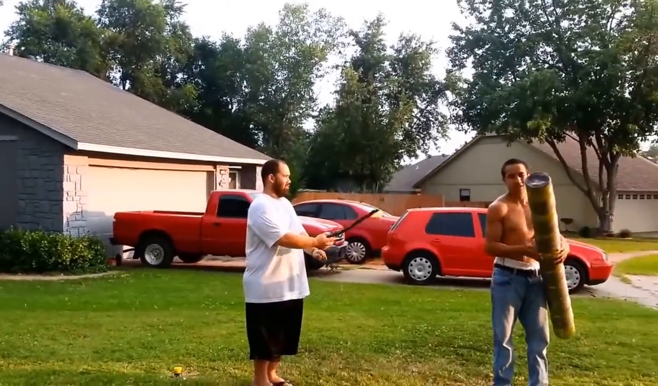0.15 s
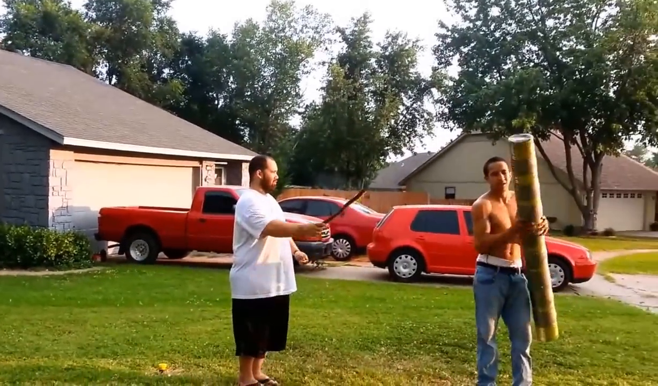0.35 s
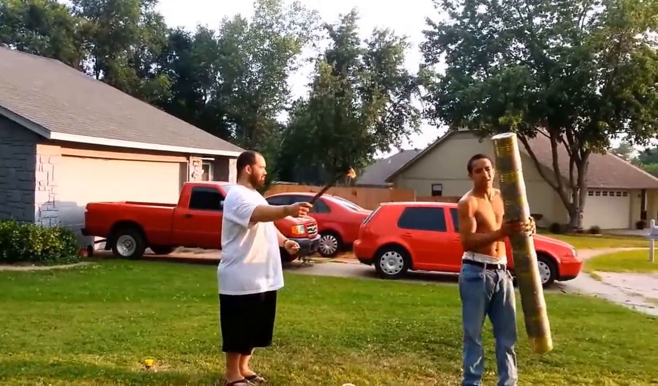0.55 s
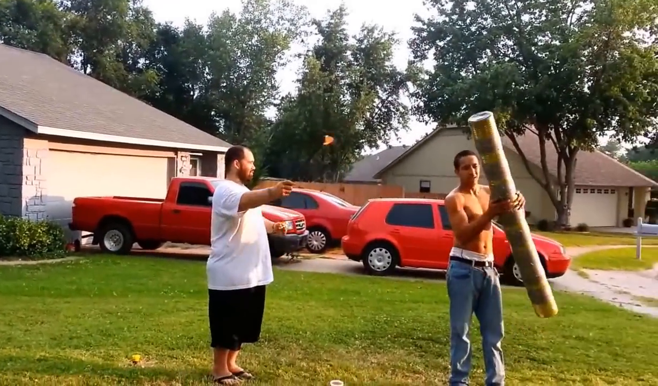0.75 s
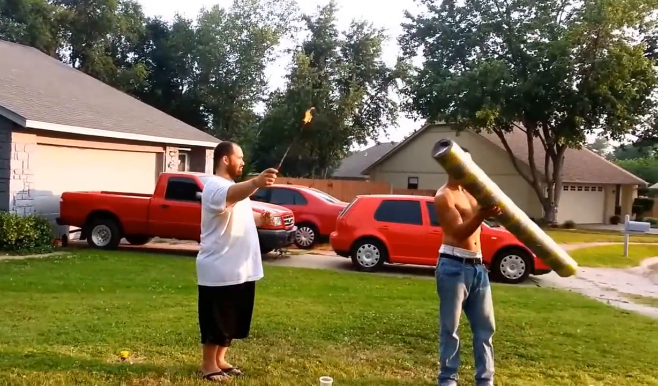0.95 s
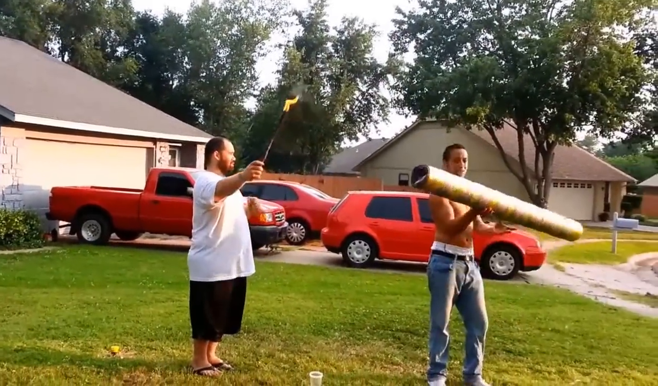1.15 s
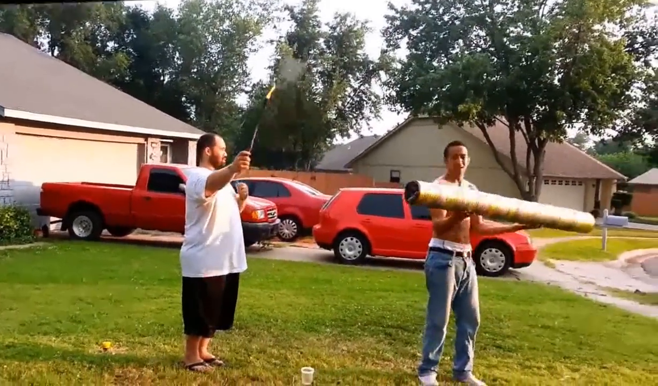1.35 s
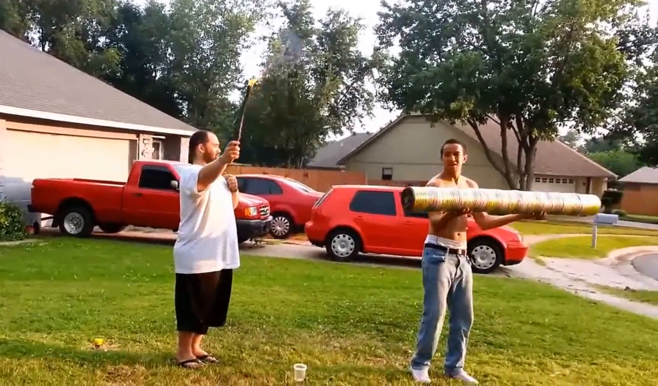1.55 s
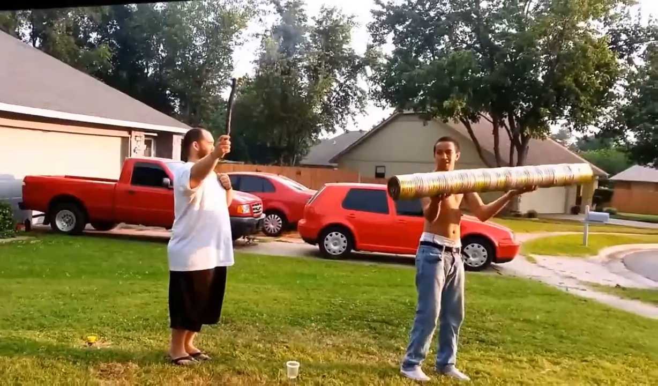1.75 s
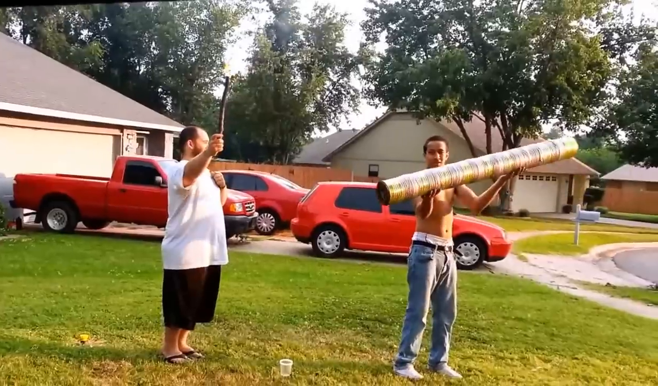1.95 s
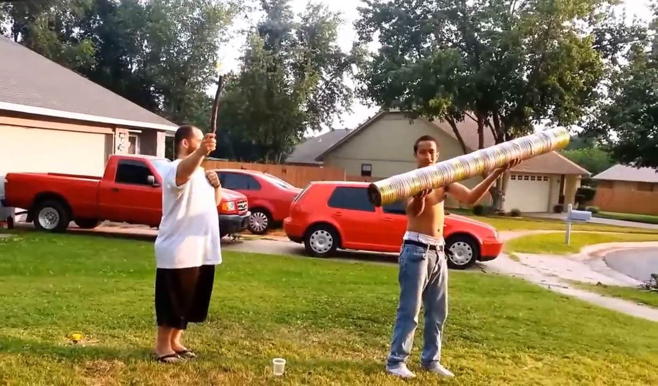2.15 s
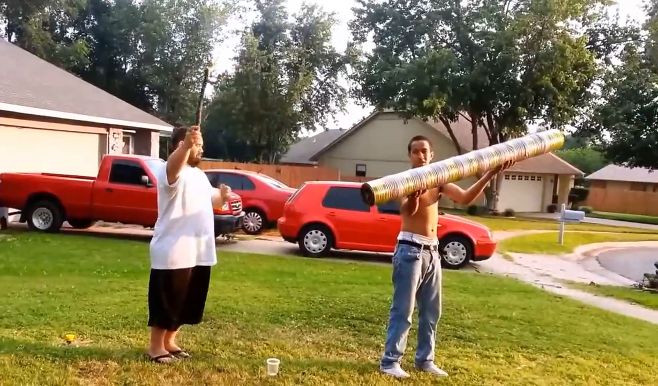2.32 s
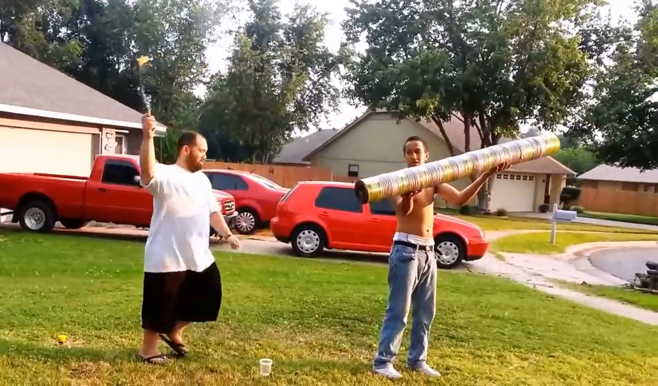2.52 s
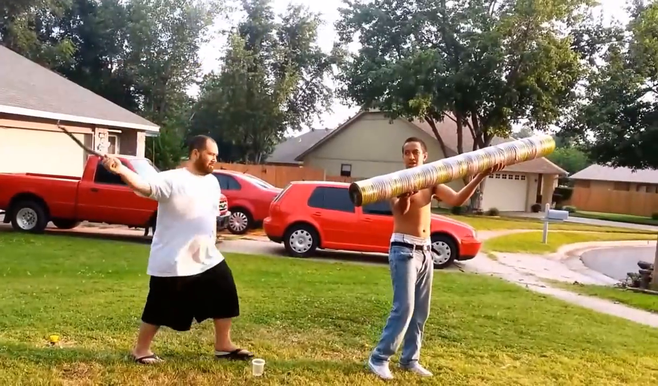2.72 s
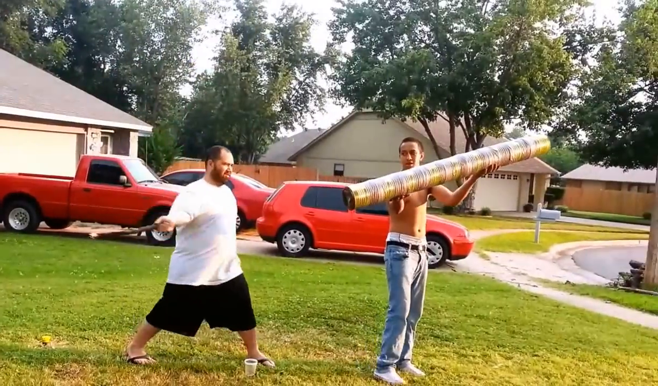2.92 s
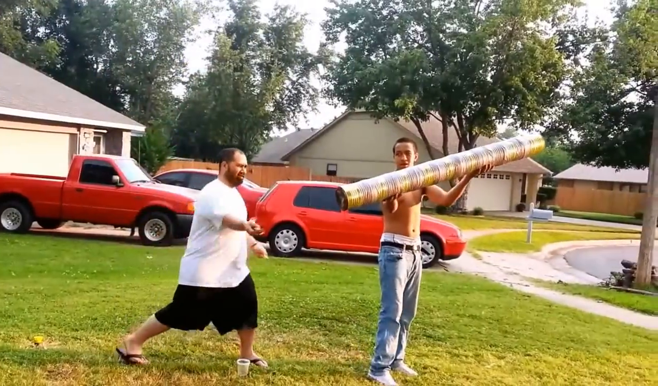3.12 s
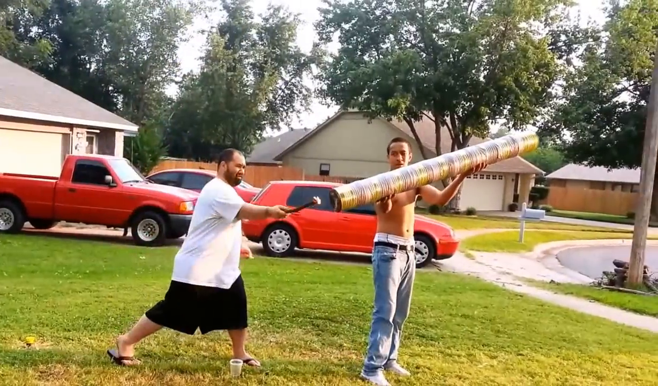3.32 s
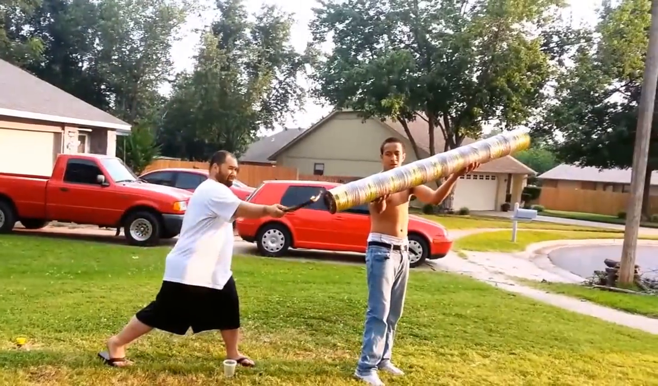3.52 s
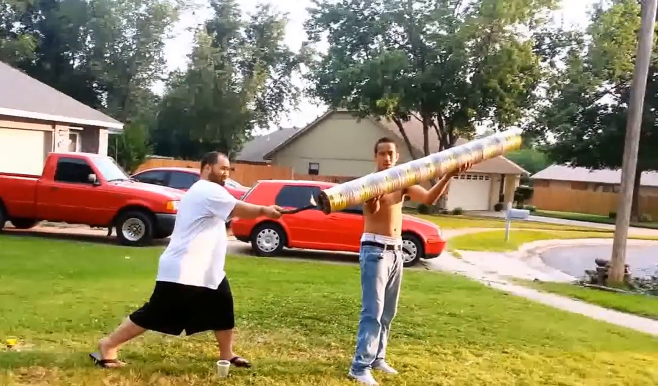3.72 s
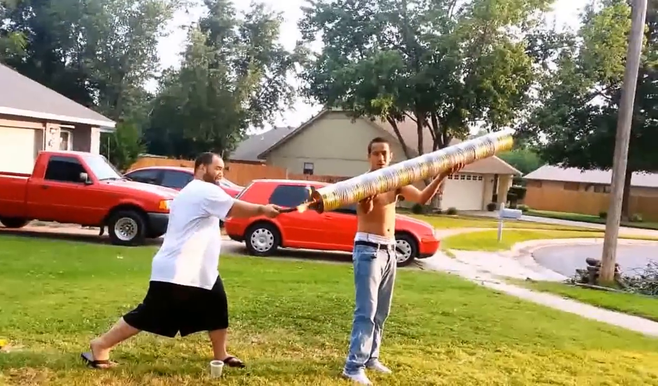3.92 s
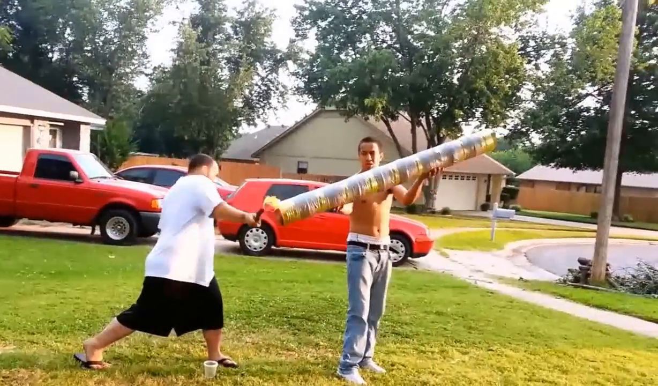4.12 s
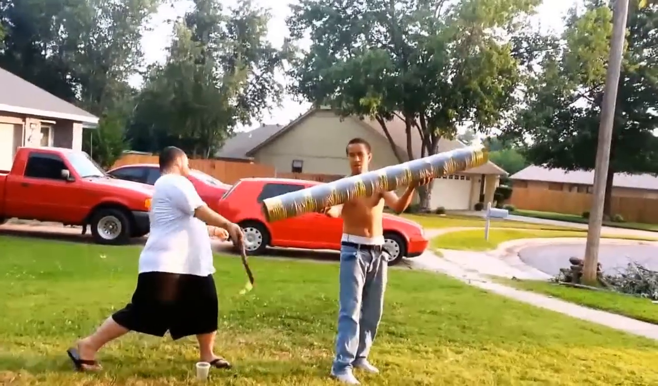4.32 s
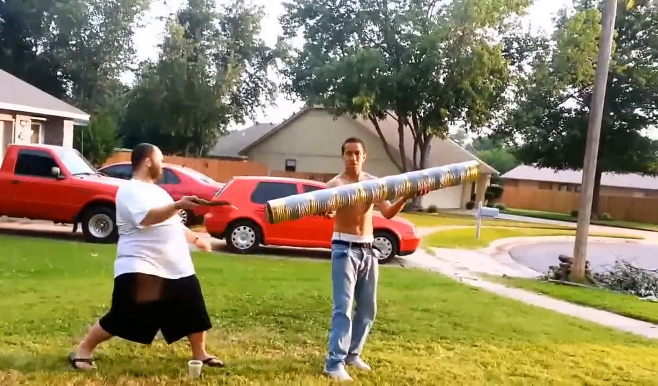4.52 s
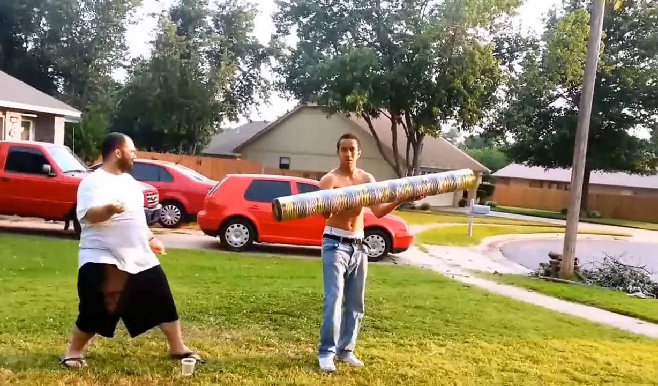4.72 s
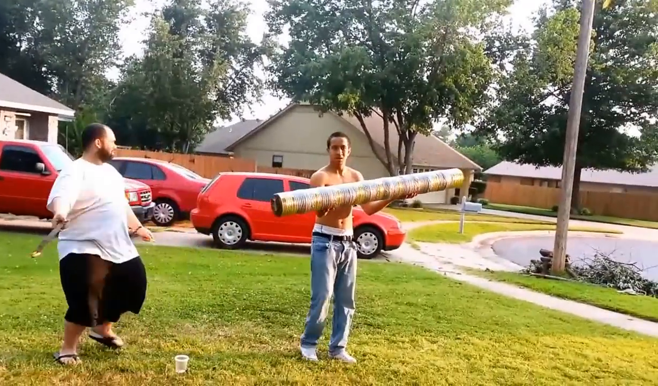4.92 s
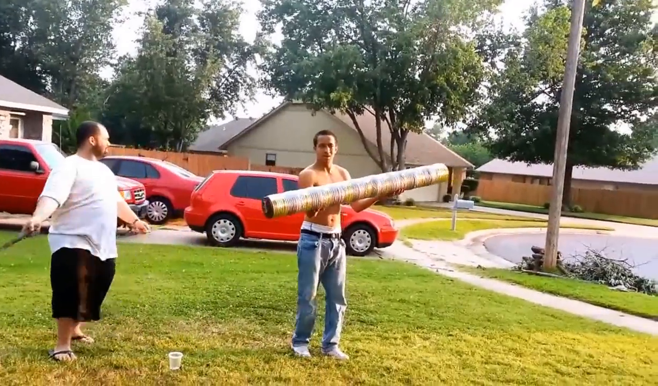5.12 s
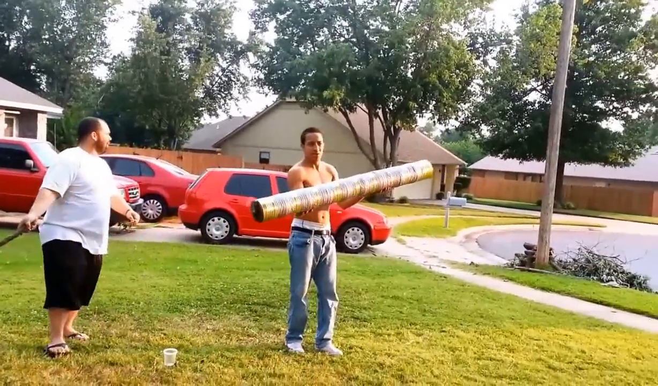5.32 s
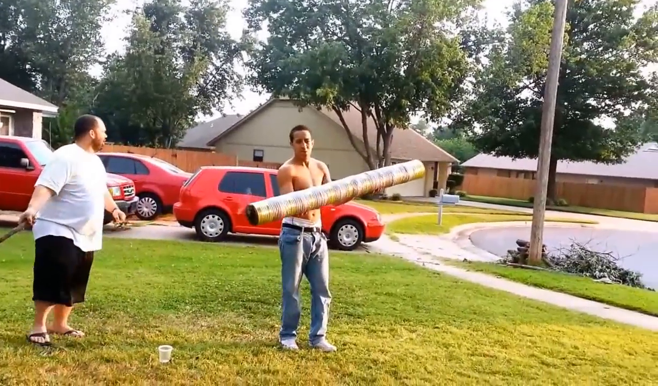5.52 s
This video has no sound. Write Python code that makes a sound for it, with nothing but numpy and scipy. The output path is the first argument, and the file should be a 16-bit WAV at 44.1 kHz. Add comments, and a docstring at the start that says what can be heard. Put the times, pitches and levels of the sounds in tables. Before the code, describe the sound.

Handheld camera outdoors among houses and trees: soft handling scuffs, insects and a low hum. A hoarse falling bird call comes before a single sharp distant pop with a short scattered tail. Then a massive, clipped cannon blast bursts out, full of snaps and thuds from nearby walls, followed half a second later by a second crack from far houses. The roar dulls and dies away, the yard returns and the bird calls again.

```python
"""Tube cannon in a suburban yard

Outdoors among houses and trees, a homemade tube cannon fires and overloads a small camera microphone.
The bang is shaped noise and separate echoes that darken into a roll; far house fronts return a second crack.
Earlier a firecracker, some way off, gives a sharp pulse, wall echoes and a scattered tail.
An air conditioner hums in noise bands under a wash of leaves and far traffic; insects shrill in bands and
thin tones, soft handling noises scuff and bump, and a bird gives two falling calls built from harmonics."""
import sys
import numpy as np
from scipy import signal
from scipy.fft import rfft, irfft, next_fast_len
from scipy.io import wavfile
from scipy.ndimage import uniform_filter1d

SR = 44100
rng = np.random.default_rng(int(sys.argv[2]) if len(sys.argv) > 2 else 0)


def unload_audio(sound):
    """Save the sound as a 16-bit wav file, at the path given as the first command line argument."""
    columns = np.transpose(np.atleast_2d(sound))
    # keep every value between -1 and 1, then stretch to whole-number steps
    steps = np.round(np.clip(columns, -1, 1) * 32767)
    wavfile.write(sys.argv[1], SR, steps.astype(np.int16))


N = 245135
TIME = np.arange(N) / SR

# The yard's wash of leaves and far traffic: f/Hz, relative level/dB per Hz
YARD_SPECTRUM = [(12, -68), (20, -43), (76, -15.5), (135, -7.5), (169, -9.5), (211, -1), (249, -7),
                 (433, -3.5), (587, -12), (1590, -15), (1850, -14), (2280, -16), (3250, -16.5), (3970, -17),
                 (12000, -36.5), (14500, -46), (15500, -70)]
# Air conditioner hum, one noise band a row: f/Hz, width/Hz, rms level/dB
AIR_CONDITIONER = [(104.4, 2.3, -58), (142, 2.9, -51), (216, 9, -51), (292, 19, -49.5), (354, 18, -49),
                   (466, 66, -49.5)]
# Insect bands in the trees, at full strength between: start t/s, end t/s, f/Hz, width/Hz, rms level/dB
INSECT_BANDS = [(0, 6.1, 1954, 45, -54), (0, 0.73, 2050, 55, -51.5), (1.1, 3.65, 2640, 130, -54.5),
                (0.63, 5.56, 3890, 160, -53), (0.088, 5.56, 6600, 1300, -53)]
# Thin notes among the insects, at full strength between: start t/s, end t/s, f/Hz, rms level/dB
INSECT_NOTES = [(-0.5, 6.1, 2056, -56), (1.4, 3.63, 2703, -54), (-0.5, 1.8, 2500, -60),
                (-0.5, 1.56, 3585, -52.5), (-0.5, 5.56, 3585, -55.5), (1.5, 2, 4215, -54.5),
                (1.5, 3.8, 4230, -61)]
# Soft handling noises: t/s, rms level before the fades/dB, f/Hz, length/s
HANDLING_NOISES = [(0.177, -44, 7000, 0.096), (0.194, -39, 7000, 0.014), (0.223, -35, 6200, 0.017),
                   (0.224, -34, 1850, 0.015), (0.197, -39, 1900, 0.015), (0.2, -33.5, 385, 0.038),
                   (0.843, -35, 400, 0.03), (3.068, -41, 298, 0.052), (3.877, -31, 260, 0.033)]

# Bird calls: start t/s, end t/s, start f/Hz, end f before the break/Hz, bend (under 1 falls early),
# tone gain/dB, rush level at the end before the fade/dB
BIRD_CALLS = [(1.217, 1.457, 891, 827, 1.05, -44, -53), (5.179, 5.428, 924, 822, 1.25, -42, -47)]
# Harmonics that swell and fade in turn as the throat moves, one list a call:
# multiple of the call's f, level against the tone gain/dB, loudest t/s, spread/s
BIRD_HARMONICS = [
    [(4, 7, 1.385, 0.085), (6, -6, 1.25, 0.04), (7, -3, 1.375, 0.055), (8, -2, 1.405, 0.045),
     (9, -0.5, 1.314, 0.06), (10, -9, 1.35, 0.06), (11, -8.5, 1.355, 0.065), (15, -11, 1.38, 0.08)],
    [(4, 8, 5.36, 0.115), (6, -6, 5.3, 0.07), (8, 0.5, 5.345, 0.115), (9, -6, 5.35, 0.09),
     (10, -9, 5.28, 0.085), (11, -13, 5.35, 0.054), (15, -17, 5.33, 0.06)],
]
# Notes from the other side of its voice box: start t/s, end t/s, start f/Hz, end f/Hz, rms level/dB
BIRD_SIDE_NOTES = [(1.412, 1.462, 4130, 4040, -46), (5.185, 5.32, 6930, 6580, -48)]
# Each call breaks at its end: time constant, and the shares by which the pitch drops and wavers
BREAK_S, BREAK_DROP, BREAK_WAVER = 0.014, 0.07, 0.025
WALL_S, WALL_DB = 0.062, -10  # a house wall repeats each call
RUSH_HZ, RUSH_WIDTH_HZ = 6800, 1700  # the hoarse rush under each call

# Firecracker's direct wave: f/Hz, relative level/dB per Hz
POP_SPECTRUM = [(40, -50), (150, -6.5), (300, -1.5), (550, 9), (900, 3), (1400, -10), (2500, -9.5),
                (4000, -44), (8000, -62), (15000, -72)]
# Its scattered tail: f before air loss/Hz, relative level/dB per Hz
POP_TAIL_SPECTRUM = [(100, -28), (300, 0.5), (700, 3), (1600, 3), (3000, -3.5), (5000, -11.5), (8000, -25),
                     (15000, -78)]
# Direct wave, then its return off a flat wall and eaves: t/s, peak level/dB
POP_ARRIVALS = [(1.875, 2), (1.9106, -9)]
# Echoes from the ground, cars and houses: t/s, peak level of the main swing/dB, f/Hz
POP_WALL_ECHOES = [(1.8760, -15, 1600), (1.8795, -21, 330), (1.8830, -15, 1650), (1.8956, -12.5, 1900),
                   (1.9114, -18, 1600), (1.9133, -13.5, 604), (1.9319, -14.5, 1300), (1.9555, -21, 2200),
                   (1.972, -19, 1500), (2.023, -19, 1500), (2.03, -20, 2700), (2.061, -30, 1900)]
# Tails from the yard, the houses and the street beyond: t/s, starting level/dB, fall/(dB/s)
POP_TAIL_FADES = [(1.875, -25, 108), (1.911, -31.5, 48), (2.02, -37.5, 73)]
POP_S, POP_SMEAR_S = 1.875, 0.002

# Sharp part of the bang leaving the tube: f/Hz, relative level/dB per Hz
CRACK_SPECTRUM = [(200, -19), (400, -4), (600, 0.5), (1000, 1.5), (1700, -0.5), (2800, -1), (4500, -2.5),
                  (7000, -3.5), (9500, -11), (11500, -22), (15000, -42)]
# Low part of the bang leaving the tube: f/Hz, relative level/dB per Hz
BOOM_SPECTRUM = [(20, -48), (45, -26), (80, -11), (130, 0), (215, 3), (300, -1), (440, 2), (600, -7.5),
                 (1000, -10), (3000, -60)]
# The bang as far house fronts throw it back: f before air loss/Hz, relative level/dB per Hz
SLAP_SPECTRUM = [(100, -18), (500, -11), (1000, 1), (1900, 0.5), (2700, -10), (5000, -17.5), (9000, -25),
                 (15000, -73)]
# Bright edge of the bang before air and grass dull it: f/Hz, relative level/dB per Hz
EDGE_SPECTRUM = [(100, 2), (1000, -7), (4000, -2), (7000, -9), (10000, -3.5), (13500, -2.5), (15000, -31)]
# Single echoes from walls and roofs: t/s, peak level of the main swing/dB, f/Hz
BANG_WALL_ECHOES = [(4.0115, 6.5, 420), (4.021, 5, 353), (4.038, -3, 383), (4.0465, 1, 344),
                    (4.054, -5, 386), (4.0705, 0, 350), (4.079, 0, 395), (4.088, -5, 334),
                    (4.103, -3, 1100), (4.106, -3, 2600), (4.111, -5, 400), (4.1265, 3, 930),
                    (4.1725, 2, 895), (4.173, 12, 1840), (4.178, -10, 278), (4.189, 5, 890),
                    (4.202, -3, 1000), (4.221, -6, 890), (4.228, -1, 1400), (4.248, 15, 2600),
                    (4.278, -1, 1470), (4.302, 0, 403), (4.303, 7, 2680), (4.326, 3.5, 2550),
                    (4.328, -5.5, 376), (4.358, 1, 2800), (4.375, -4, 520), (4.381, -9, 220),
                    (4.457, -4.5, 432), (4.4675, 1, 171), (4.468, -6.5, 104), (4.469, 0, 930),
                    (4.488, -3, 277), (4.499, -10.5, 199), (4.506, -8, 130), (4.5125, 7, 1380),
                    (4.519, 8, 1580), (4.5255, 4, 1430), (4.5415, 9.5, 1600), (4.562, 4, 900),
                    (4.579, -13, 1800), (4.587, -4, 1760), (4.592, 3, 1400)]
# Swells from groups of houses, before the near boost: t/s, crack gain/dB, slap gain/dB, boom gain/dB,
# rise time constant/s, fall/(dB/s)
HOUSE_SWELLS = [(4.025, -10.5, -43, -11, 0.014, 128), (4.478, -24, -14.5, -11, 0.0082, 117),
                (4.518, -13.5, -14.5, -33, 0.025, 81), (4.675, -36, -27, -24.5, 0.03, 70),
                (4.765, -48, -28, -31, 0.015, 79), (5.04, -55, -37, -37.5, 0.047, 56)]
FIRE_S, BANG_SMEAR_S = 3.9716, 0.0017
STREET_S, SAG_DB_PER_S = 0.35, 10  # the roll sags slowly while the wave crosses the street
# Gains of the roll before the near boost, and its fall after the street
CRACK_DB, CRACK_FALL_DB_PER_S = -6.5, 35
BOOM_DB, BOOM_RISE_S, BOOM_FALL_DB_PER_S = -15, 0.011, 36
# Fences, trunks and cars: echo count, time they span, level above the rolling crack gain, spread, pitch range
FACET_COUNT, FACET_SPAN_S, FACET_DB, FACET_SPREAD_DB = 70, 0.85, 5, 2.5
FACET_LOW_HZ, FACET_HIGH_HZ = 300, 3000
# The rumble behind the far houses' thump
RUMBLE_S, RUMBLE_HZ, RUMBLE_WIDTH_HZ = 4.47, 89, 18
RUMBLE_DB, RUMBLE_FALL_DB_PER_S = -33.5, 34


def amp(db):
    """Converts decibels to gain."""
    return 10 ** (np.asarray(db) / 20)


def evened(x):
    """Scales a signal to rms 1."""
    return x / np.sqrt(np.mean(x ** 2) + 1e-20)


def read(points, hz):
    """Reads a spectrum in dB on a log-frequency axis."""
    f, value = np.transpose(points)
    return np.interp(np.log(hz + 1), np.log(f), value)


def add(mix, s, sound):
    """Mixes a sound in at time s, cutting whatever runs past the end."""
    part = mix[round(s * SR):][:len(sound)]
    part += sound[:len(part)]


def coloured(x, spectrum):
    """Filters a signal by a spectrum and scales it to rms 1."""
    gain = amp(read(spectrum, np.fft.rfftfreq(len(x), 1 / SR)))
    return evened(irfft(rfft(x) * gain, len(x)))


def band_noise(hz, width, size):
    """Noise in one resonance, scaled to rms 1 over the full length; around 0 Hz it is a slow random curve."""
    full = next_fast_len(N)
    f = np.fft.rfftfreq(full, 1 / SR)
    resonance = 1 / (1 + ((f - hz) / width) ** 2)
    return evened(irfft(rfft(rng.standard_normal(full)) * resonance, full))[:size]


def scatter(spectrum, start_s, lumpy_db, patchy_db, air_db=1.0, air_power=0.99):
    """Countless reflections in clumps of differing colour; later ones lose treble in the air they cross."""
    size = next_fast_len(N)
    clumps = evened(uniform_filter1d(rng.standard_normal(size), size=130))
    taps = coloured(rng.standard_normal(size) * amp(lumpy_db * clumps), spectrum)
    hz, t, z = signal.stft(taps, SR, nperseg=256)
    patches = uniform_filter1d(rng.standard_normal(z.shape), size=3, axis=1)
    patches = evened(uniform_filter1d(patches, size=5, axis=0))
    # air_db is the loss per second at 1 kHz; it stops growing after one second
    air_loss_db = air_db * (hz[:, None] / 1000) ** air_power * np.clip(t - start_s, 0, 1)
    dark = signal.istft(z * amp(patchy_db * patches - air_loss_db), SR, nperseg=256)[1][:N]
    local_rms = np.sqrt(uniform_filter1d(dark ** 2, size=2200) + 1e-12)  # over 50 ms
    return dark / local_rms * (TIME >= start_s)  # level is left to the caller's fade


def echoes(rows, smear_s, damping, rough):
    """Each surface returns a short pressure swing, then a cluster of weaker ones from its uneven face."""
    out, t = np.zeros(N), TIME[:SR // 2]
    for s, db, hz in rows:
        ring = t ** 2 * np.sin(2 * np.pi * hz * t) * np.exp(-damping * hz * t)
        swing = np.gradient(ring)  # push and pull cancel
        cluster = rough * np.sqrt(hz / SR) * rng.standard_normal(len(t)) * np.exp(-t / smear_s)
        smeared = swing + signal.fftconvolve(cluster, swing)[:len(t)]
        add(out, s, amp(db) * smeared / abs(swing).max())
    return out


def yard(wash_db=-37.5, swell_db=1.0):
    """A slowly swelling wash of leaves and far traffic, with the air conditioner as narrow noise bands."""
    wash = coloured(rng.standard_normal(next_fast_len(N)), YARD_SPECTRUM)[:N]
    wash *= amp(wash_db + swell_db * band_noise(0, 1.3, N))
    hum = sum(amp(db) * band_noise(hz, width, N) for hz, width, db in AIR_CONDITIONER)
    return wash + hum


def insects(fade_s=0.17, waver_hz=5, flicker_db=3):
    """Soft shrill noise bands that come and go, with thin notes wavering in pitch and level among them."""
    def sings(start, end):
        """Fades a singer in before its start and out after its end."""
        return np.interp(TIME, [start - fade_s, start, end, end + fade_s], [0, 1, 1, 0])

    chorus = np.zeros(N)
    for start, end, hz, width, db in INSECT_BANDS:
        chorus += amp(db) * band_noise(hz, width, N) * sings(start, end)
    for start, end, hz, db in INSECT_NOTES:
        pitch_hz = hz + waver_hz * band_noise(0, 9.9, N)
        note = np.sin(2 * np.pi * np.cumsum(pitch_hz) / SR) * amp(flicker_db * band_noise(0, 10, N))
        chorus += amp(db) * evened(note) * sings(start, end)
    return chorus


def handling():
    """Brief scuffs and soft bumps, each a band of noise that rises and falls once."""
    out = np.zeros(N)
    for s, db, hz, length in HANDLING_NOISES:
        size = round(length * SR)
        add(out, s, amp(db) * band_noise(hz, hz * 0.5, size) * np.hanning(size))
    return out


def bird(waver=0.003, rasp=0.3, wet_db=-10, leaves_s=0.08, taper=0.2):
    """A thin, hoarse cry falls and breaks off downwards; harmonics swell in turn, a house wall repeats it."""
    out = np.zeros(N)
    for call, harmonics in zip(BIRD_CALLS, BIRD_HARMONICS):
        start, end, high_hz, low_hz, bend, db, rush_db = call
        size = round((end - start) * SR)
        along, t = np.linspace(0, 1, size), start + TIME[:size]
        breaking = np.exp((t - end) / BREAK_S)
        fall_hz = high_hz + (low_hz - high_hz) * along ** bend
        wobble = (waver + BREAK_WAVER * breaking) * band_noise(0, 85, size)
        phase = 2 * np.pi * np.cumsum(fall_hz * (1 - BREAK_DROP * breaking + wobble)) / SR
        tone = np.zeros(size)
        for multiple, level, peak_s, spread_s in harmonics:
            swell = np.exp(-0.5 * ((t - peak_s) / spread_s) ** 2)
            tone += amp(level) * swell * np.sin(multiple * phase)
        hoarse = amp(db) * tone * (1 + rasp * band_noise(0, 210, size))
        rush = amp(rush_db) * along * band_noise(RUSH_HZ, RUSH_WIDTH_HZ, size)
        add(out, start, (hoarse + rush) * signal.windows.tukey(size, taper))
    for start, end, high_hz, low_hz, db in BIRD_SIDE_NOTES:
        size = round((end - start) * SR)
        hz = np.linspace(high_hz, low_hz, size) * (1 + waver * band_noise(0, 90, size))
        note = np.sin(2 * np.pi * np.cumsum(hz) / SR) * signal.windows.tukey(size, 0.5)
        add(out, start, amp(db) * evened(note))
    add(out, WALL_S, amp(WALL_DB) * out)
    tail = rng.standard_normal(SR) * np.exp(-TIME[:SR] / leaves_s)  # diffuse reverberation
    return out + amp(wet_db) * signal.fftconvolve(out, tail / np.linalg.norm(tail))[:N]


def firecracker():
    """One sharp pressure pulse, its repeat off a wall, smaller echoes and a short scattered tail."""
    size = 4096
    log_gain = np.log(amp(read(POP_SPECTRUM, abs(np.fft.fftfreq(size, 1 / SR)))))
    # minimum phase packs the energy at the very front of the pulse
    pulse = np.fft.ifft(np.exp(np.conj(signal.hilbert(log_gain)))).real[:size // 2]
    power = sum(amp(db - fall * abs(TIME - s)) ** 2 * (TIME >= s) for s, db, fall in POP_TAIL_FADES)
    out = scatter(POP_TAIL_SPECTRUM, POP_S, lumpy_db=1.0, patchy_db=2.0) * np.sqrt(power)
    for s, db in POP_ARRIVALS:
        add(out, s, -amp(db) * pulse / abs(pulse).max())
    return out + echoes(POP_WALL_ECHOES, POP_SMEAR_S, damping=3.3, rough=0.25)


def cannon(blast_db=12, blast_s=0.032, edge_db=-3.5, edge_s=0.068, apart=0.26,
           flare_db=-16, flare_s=0.0094):
    """The flame flares through the tube, the charge bursts out, and the street rolls it back."""
    age = np.maximum(TIME - FIRE_S, 0)
    fired = TIME >= FIRE_S
    crack_gain, slap_gain, boom_gain = roll(age)
    near_db = blast_db * np.exp(-age / blast_s)  # direct blast and the nearest surfaces
    crack = scatter(CRACK_SPECTRUM, FIRE_S, lumpy_db=1.0, patchy_db=1.5, air_db=1.23, air_power=1.47)
    slap = scatter(SLAP_SPECTRUM, FIRE_S, lumpy_db=2.5, patchy_db=0.0, air_db=3.3)
    # lawns soak up the low mids, so the boom sinks to a rumble
    boom = scatter(BOOM_SPECTRUM, FIRE_S, lumpy_db=1.5, patchy_db=1.0, air_db=19, air_power=0.56)
    rolling = (crack * crack_gain + slap * slap_gain + boom * boom_gain) * amp(near_db)
    flare = coloured(rng.standard_normal(N), CRACK_SPECTRUM) * amp(flare_db)
    flare *= np.exp(-abs(TIME - FIRE_S) / flare_s) * ~fired
    walls = echoes(BANG_WALL_ECHOES, BANG_SMEAR_S, damping=2.73, rough=0.48)
    # only the bright first wave differs between the two microphone ports
    shared, own = (coloured(rng.standard_normal(N), EDGE_SPECTRUM) for _ in range(2))
    edge = np.array([shared + apart * own, shared - apart * own])
    edge *= amp(edge_db) * np.exp(-age / edge_s) * fired
    return rolling + flare + walls + facets() + edge


def roll(age):
    """Gains of crack, slap and boom: a sagging hold, a release, and a swell from each group of houses."""
    held_db = -SAG_DB_PER_S * np.minimum(age, STREET_S)
    late = np.maximum(age - STREET_S, 0)
    crack = amp(CRACK_DB + held_db - CRACK_FALL_DB_PER_S * late)
    boom = amp(BOOM_DB + held_db - BOOM_FALL_DB_PER_S * late) * (1 - np.exp(-age / BOOM_RISE_S))
    slap = np.zeros(N)
    for s, crack_db, slap_db, boom_db, rise_s, fall in HOUSE_SWELLS:
        swell = np.exp(np.minimum(TIME - s, 0) / rise_s) * amp(-fall * np.maximum(TIME - s, 0))
        crack = np.hypot(crack, amp(crack_db) * swell)  # powers add
        slap = np.hypot(slap, amp(slap_db) * swell)
        boom = np.hypot(boom, amp(boom_db) * swell)
    return crack, slap, boom


def facets():
    """Small hard surfaces return separate snaps and thuds whose level follows the rolling crack."""
    when, strength, colour = rng.random((FACET_COUNT, 3)).T
    age = FACET_SPAN_S * (np.arange(FACET_COUNT) + when) / FACET_COUNT
    crack_gain = roll(np.maximum(TIME - FIRE_S, 0))[0]
    held = np.interp(FIRE_S + age, TIME, crack_gain)
    db = 20 * np.log10(held) + FACET_DB + FACET_SPREAD_DB * (2 * strength - 1)
    hz = FACET_LOW_HZ * (FACET_HIGH_HZ / FACET_LOW_HZ) ** colour
    return echoes(zip(FIRE_S + age, db, hz), BANG_SMEAR_S, damping=3.3, rough=0.35)


def rumble():
    """The far houses' thump leaves a narrow band of deep noise that dies away steadily."""
    fade = amp(RUMBLE_DB - RUMBLE_FALL_DB_PER_S * abs(TIME - RUMBLE_S)) * (TIME >= RUMBLE_S)
    return band_noise(RUMBLE_HZ, RUMBLE_WIDTH_HZ, N) * fade


def scene():
    """Everything reaches the two closely spaced microphone ports almost alike."""
    return yard() + insects() + handling() + bird() + firecracker() + cannon() + rumble()


def record(dry, ceiling=0.98, knee=12, edge_hz=15600):
    """The input stage flattens the bang against its ceiling, then a low-pass limits the band."""
    fine = signal.resample_poly(dry, 2, 1, axis=1)  # doubled rate reduces aliasing from the clipping
    clipped = fine / (1 + abs(fine / ceiling) ** knee) ** (1 / knee)
    flat = signal.resample_poly(clipped, 1, 2, axis=1)
    lowpass = signal.firwin(127, edge_hz, window=("kaiser", 8), fs=SR)
    return signal.oaconvolve(flat, lowpass[None], "same", axes=1)


dry = scene()
out = record(dry)
unload_audio(out)
```